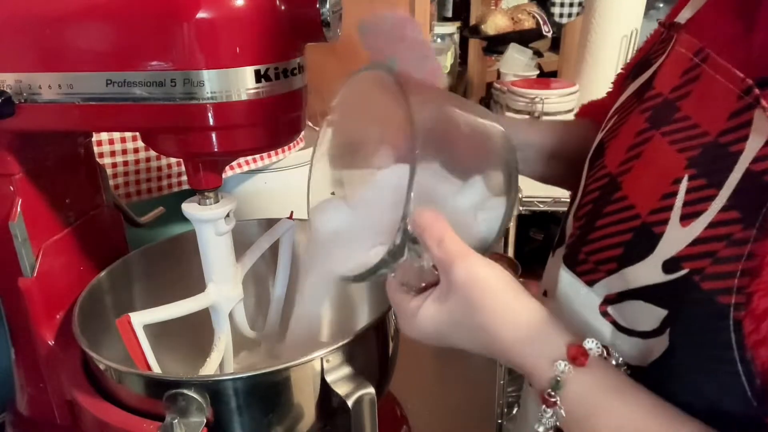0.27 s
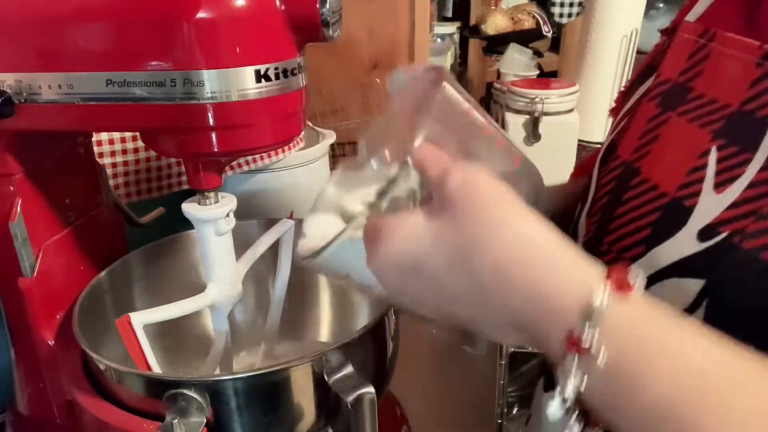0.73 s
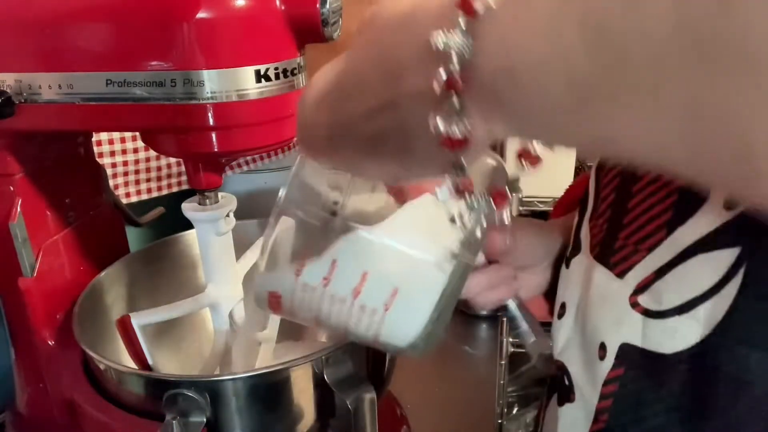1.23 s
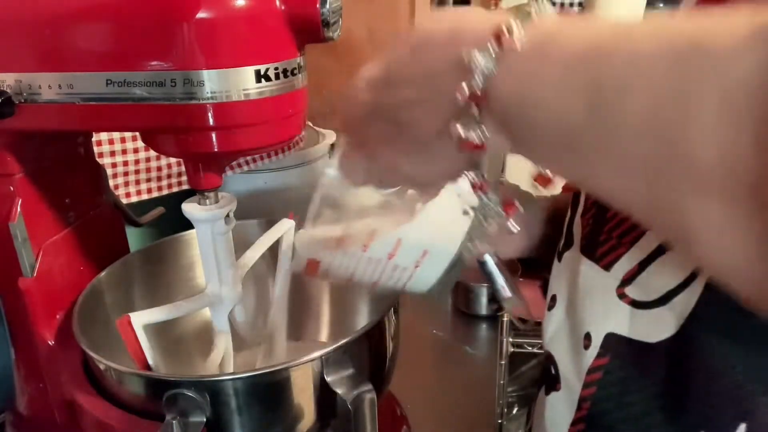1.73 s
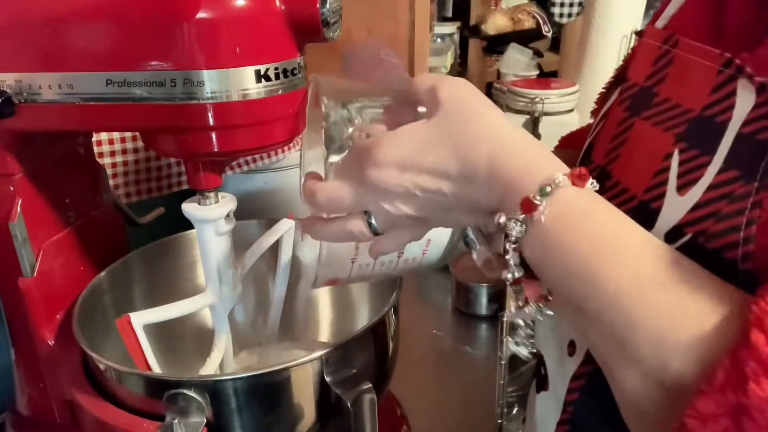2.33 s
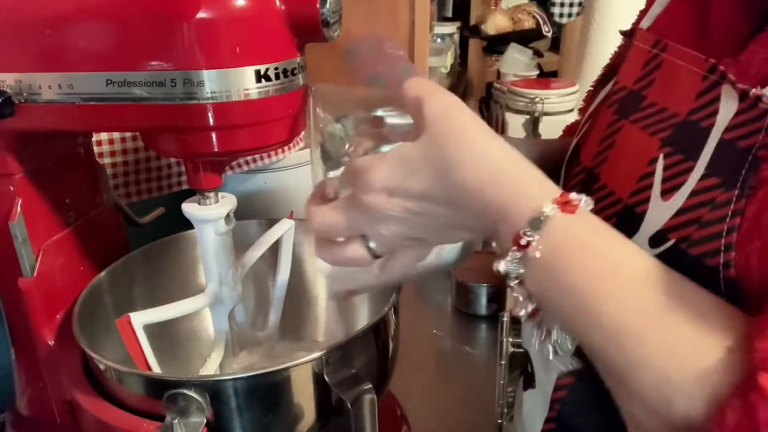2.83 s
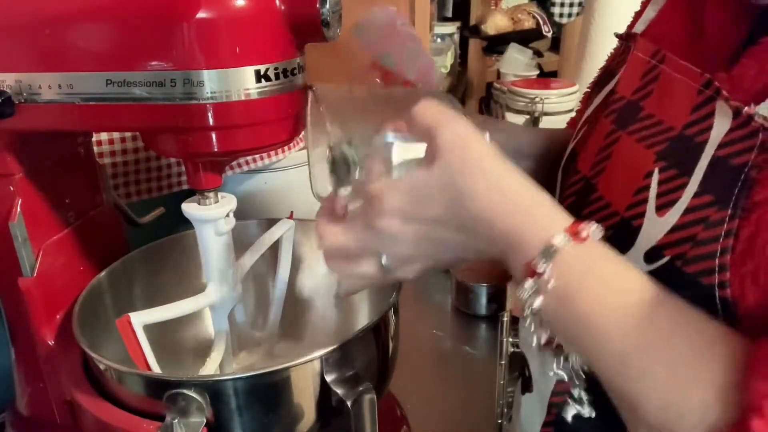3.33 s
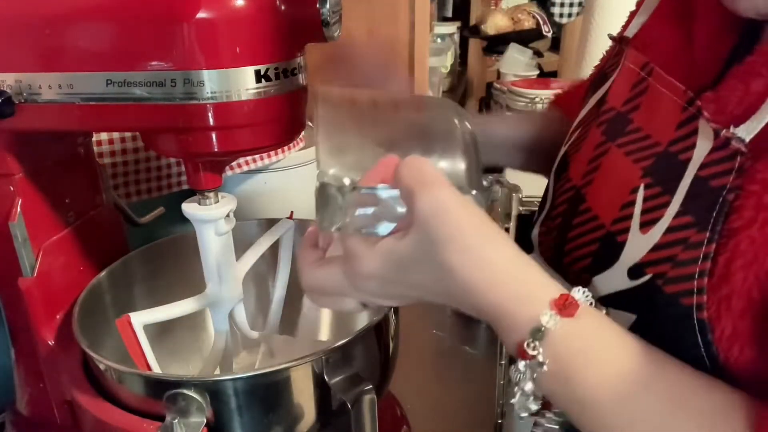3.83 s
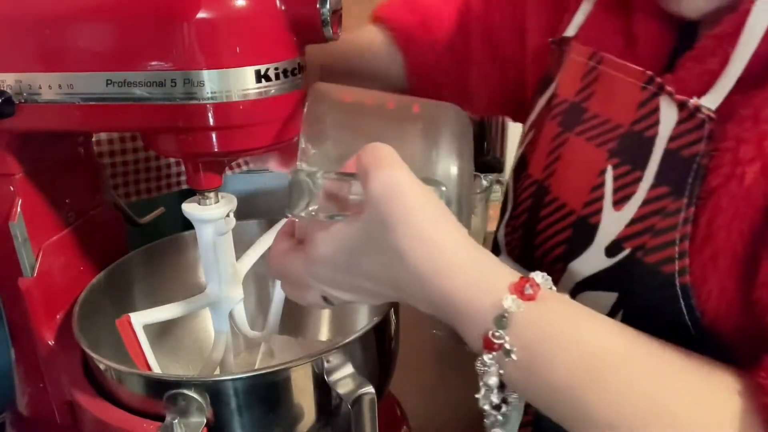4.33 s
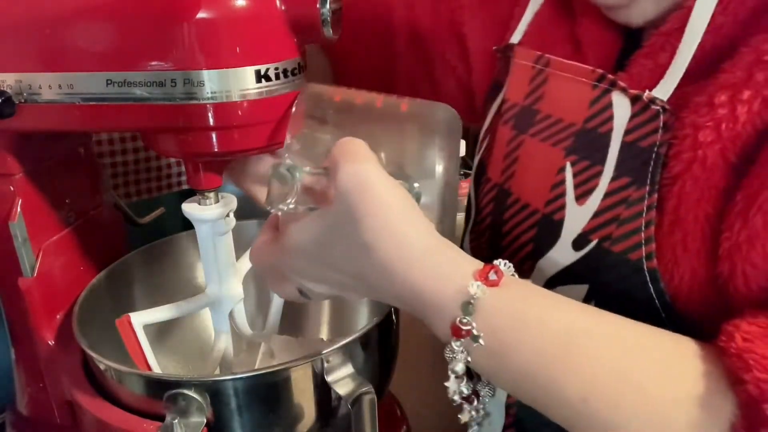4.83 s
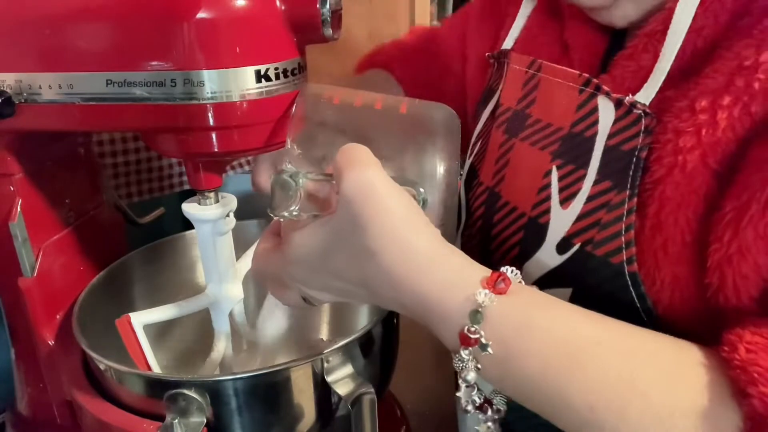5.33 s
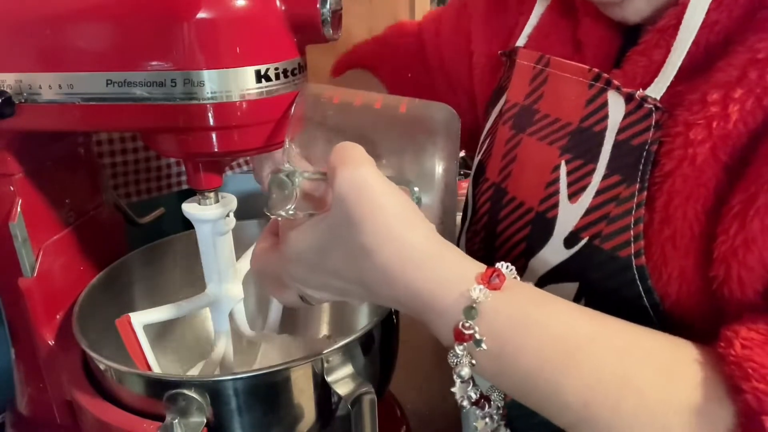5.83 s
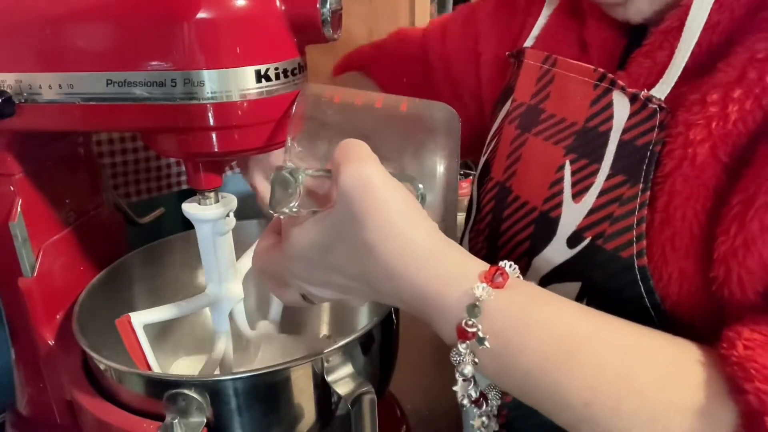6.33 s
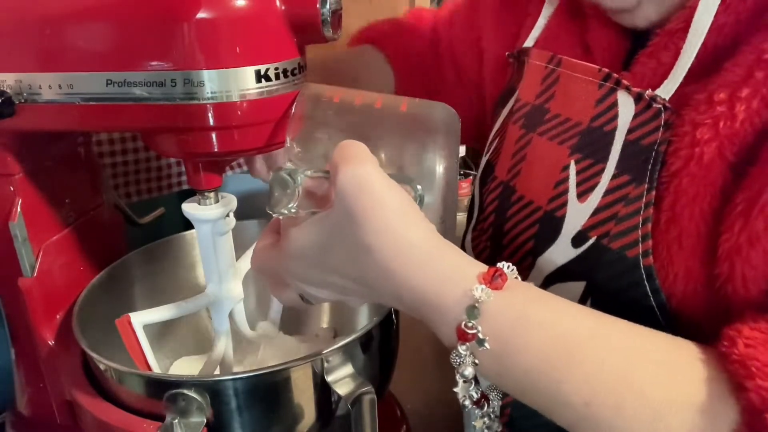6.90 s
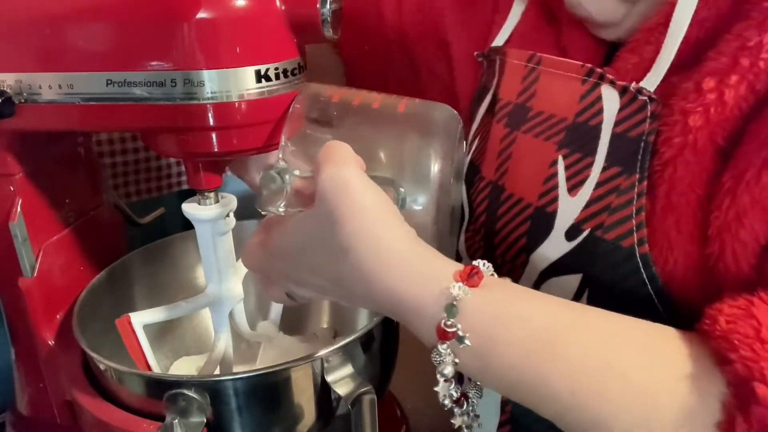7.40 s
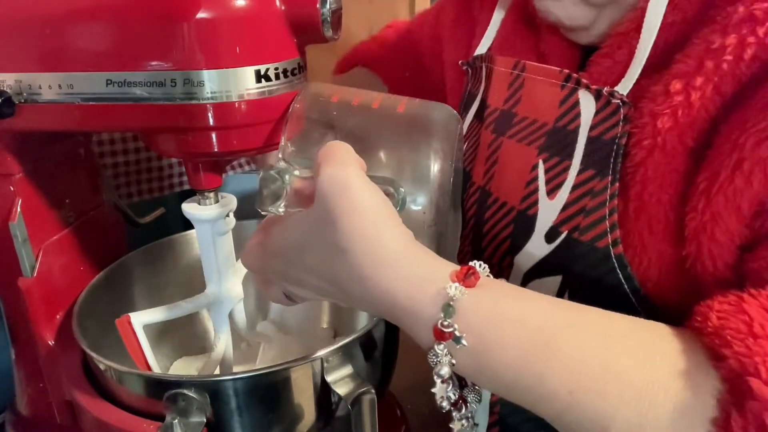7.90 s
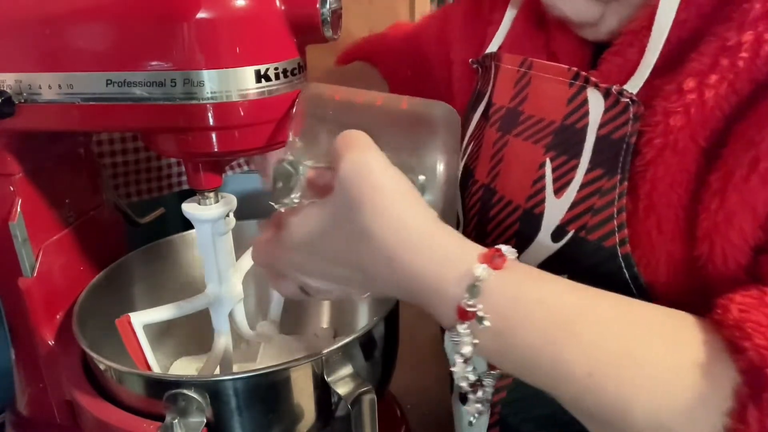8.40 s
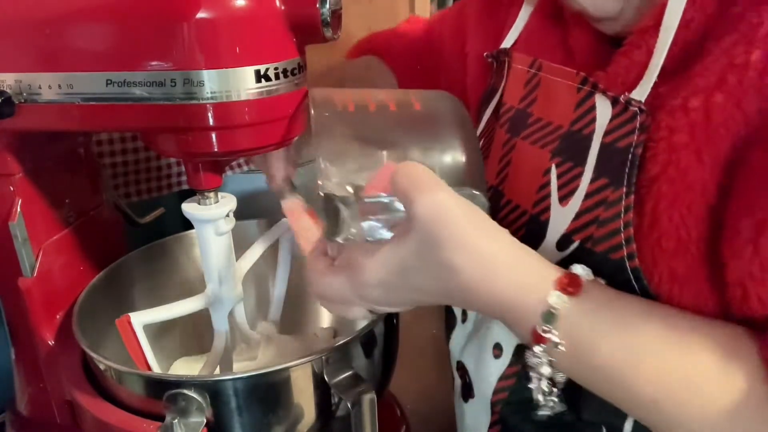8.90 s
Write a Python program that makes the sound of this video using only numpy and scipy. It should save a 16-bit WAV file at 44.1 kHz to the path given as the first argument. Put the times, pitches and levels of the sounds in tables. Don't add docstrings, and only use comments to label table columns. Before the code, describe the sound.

Close up in a small kitchen, a glass measuring cup scuffs a steel bowl, then sugar slides out with a soft hiss. Hard damped clunks burst around three seconds and again near five, followed by fingers sweeping grains from the bare glass in brighter rasps. Bead ticks scatter throughout, the stand thuds low, and a final cluster of knocks comes near nine seconds over a faint hum.

```python
import sys
import numpy as np
from scipy import signal
from scipy.fft import rfft, irfft, next_fast_len
from scipy.io import wavfile
from scipy.ndimage import uniform_filter1d, map_coordinates

SR = 44100
rng = np.random.default_rng(int(sys.argv[2]) if len(sys.argv) > 2 else 0)


def wrap_up_sound(samples):
    columns = np.atleast_2d(samples).T
    tamed = np.clip(columns, -1, 1)
    steps = np.round(tamed * 32767).astype(np.int16)
    wavfile.write(sys.argv[1], SR, steps)


def volts(x):
    e = np.asarray(x, float) / 20
    return 10 ** e


N = 403515


def rms_one(x):
    return x / np.sqrt(np.mean(x ** 2) + 1e-20)


def at_hz(points, hz):
    point_hz, point_db = np.transpose(points)
    return np.interp(np.log(hz), np.log(point_hz), point_db)


def passed(x, low_hz, high_hz):
    band = [low_hz, min(high_hz, .45 * SR)]
    return signal.sosfilt(signal.butter(2, band, "band", fs=SR, output="sos"), x)


def coloured(x, spectrum):
    hz = np.fft.rfftfreq(N, 1 / SR) + 1
    return rms_one(irfft(rfft(x) * volts(at_hz(spectrum, hz)), N))


def drift(rate):
    r = np.exp(-80 * np.pi * rate / SR)
    slow = signal.lfilter([1], [1, -2 * r, r * r], rng.standard_normal(N // 40 + 2002))[2000:]
    return np.interp(np.arange(N) / 40, np.arange(len(slow)), rms_one(slow))


def ring(clicks, hz, t60):
    r = volts(-60 / (t60 * SR))
    w = 2 * np.pi * hz / SR
    return signal.lfilter([0, np.sin(w)], [1, -2 * r * np.cos(w), r * r], clicks + 1e-18)


def grains(per_s, spread_db):
    sizes = volts(spread_db * np.minimum(rng.exponential(1, N), 5)) * rng.choice([-1, 1], N)
    return rms_one(sizes * (rng.random(N) < per_s / SR))


def strokes(rows, arch_db, rise_db, fall_db, rest_db):
    t = np.arange(0, N + 64, 64) / SR
    s, length, *levels = np.transpose(rows)[:, :, None]
    shape = -arch_db * (2 * np.clip((t - s) / length, 0, 1) - 1) ** 2
    shape = shape - rise_db * np.maximum(s - t, 0) - fall_db * np.maximum(t - s - length, 0)
    power = [np.sum(volts(2 * (db + shape)), axis=0) + volts(2 * rest_db) for db in levels]
    return [np.interp(np.arange(N) / SR, t, np.sqrt(p)) for p in power]


# (frequency [Hz], tipped [dB], held free [dB], pressed on the rim [dB])
SEAT = [(350, -12.5, -3, 10), (428, -2, -7., 0.5), (488, 1.5, -8.5, -2.5), (511.6, -9.5, 2.5, -8.5),
        (643, -1.5, 5.5, 3.5), (750, -1.5, -3, 0.), (789, -8.5, -6.5, 7.5), (885, 2, -7, 0.5),
        (962, -4, -2.5, -5.5), (1040, -2.5, 4., -1), (1190, 1.5, -0.5, 0.5), (1370, 0.5, -6.5, -4.5),
        (1484, -3, 7, -2.5), (1640, -8.5, 5, 3), (1827, 2.5, -3.5, -3), (2130, -3.5, 2.5, -1.),
        (2130, 10, -0.5, -4.5), (2464, 4.5, -7., 1), (2600, -2.5, 0.5, -1.5)]
RESEAT_S, SEATS = (2.6, 3.8, 8.4, 8.72), (1, 2, 3, 2, 3)


def seated_db(hz, s):
    levels = np.array([np.interp(hz, np.array(SEAT)[:, 0], column) for column in np.transpose(SEAT)])
    return levels[np.array(SEATS)[np.searchsorted(RESEAT_S, s)]]


# (frequency [Hz], level [dB], time to fall 60 dB [s])
BODY = [(334, -24.5, .08), (432, 2, 0.071), (477, 8.5, 0.03), (508.2, 6, 0.045), (641, -20, 0.13),
        (729, -6.5, 0.047), (777.3, -8.5, 0.049), (898.7, -4, 0.05), (958, 2.5, 0.023), (1053, 0, 0.036),
        (1164, -12, 0.069), (1385.5, -10, 0.065), (1475, -20.5, 0.054), (1557, -10, 0.022),
        (1830, 1, 0.013), (2106, 2, 0.022), (2110, -13.5, 0.025), (2440, -11, 0.032), (3620, -12, 0.098),
        (4010, -8, 0.038), (4775, -4, 0.13), (5020, -1.5, 0.076), (6235, 0.5, 0.075), (2870, -11, 0.13),
        (8600, -7, 0.011)]
GRAZE_DB, GRAZE_RISE_DB_PER_S = -28.5, 1700.5


def blows(table, contact_s, rattle_db, rattle_s):
    t, force = np.arange(5000) / SR, np.zeros((len(BODY), N + 5000))
    x = t / contact_s
    push = x * np.exp(-x)
    rattle = volts(rattle_db - 60 * t / rattle_s) * np.minimum(x, 1)
    graze = volts(GRAZE_DB - GRAZE_RISE_DB_PER_S * t[999::-1])
    hz, usual = np.array(BODY)[:, :1], np.sqrt(np.sum(push ** 2))
    zone = np.searchsorted([600, 1700, 2700], hz[:, 0])
    turn = np.exp(2j * np.pi * hz * t[:1000])
    noises = rng.standard_normal((len(table), len(BODY), 1000))
    for (s, db, low, mid, high), noise in zip(table, noises):
        drive = abs(np.sum(noise * push[:1000] * turn, axis=1))
        evened_push = push / np.maximum(drive, 0.68 * usual)[:, None]
        chatter = np.tile(noise, 5) * (evened_push + rattle / usual)
        zone_db = np.array([low, 0, mid, high])[zone]
        share = volts(db + zone_db + seated_db(hz[:, 0], s) + 2.0 * noise[:, 0])[:, None]
        start = round(s * SR) - 40
        force[:, start:start + len(t)] += share * chatter
        first = max(start - 1000, 0)
        force[:, first:first + 1000] += share * noise[::-1] * graze / usual
    return force[:, :N]


# (time [s], peak level [dB], low modes [dB], 2 kHz modes [dB], glass ring [dB])
KNOCKS = [(1.033, -15.5, -10, -9, -16), (1.039, -20, -8, -2.5, -14), (2.712, -25.5, -6.5, -9.5, -19),
          (2.733, -23.5, -8, -10.5, -19.5), (2.788, -25.5, -5, -20, -21), (2.807, -18.5, -8, -8.5, -22.5),
          (3.085, -13, -10.5, -0.5, -19.5), (3.159, -17, -9.5, -9, -24.5), (3.316, -10.5, -7.5, 2.5, -17),
          (3.449, -19, -1.5, 0, -22), (3.465, -7.5, -12.5, -4, -11.5), (3.573, -23.5, -8.5, -8, -20),
          (4.832, -12.5, -7, -5.5, -23), (4.866, -18, -10.5, -13, -27.5), (4.964, -15.5, -10, -20, -30.5),
          (4.987, -23.5, -5, -19.5, -33), (5.91, -26.5, -3, -27, -46.5), (7.398, -25, -3.5, -7.5, -30),
          (7.425, -28, -4, -11.5, -31), (8.531, -27.5, -15, -16, -27.5), (8.666, -28.5, -13, -18, -28),
          (8.687, -32.5, -16, -6.5, -27), (.037, -37, -6.5, -13, -20), (3.511, -28.5, -4, -7, -24),
          (8.733, -17, -3.5, -7, -20.5), (8.766, -15.5, -8, -6.5, -21.5), (8.785, -19, -16, -1.5, -36),
          (8.799, -20, -21, -8, -23), (3.006, -37, -2, -21.5, -29.5), (4.753, -33.5, -6, -15.5, -32),
          (5.003, -32, -6, -11, -28), (5.858, -57, 7, -20, -26.5), (5.927, -33.5, -10, -13, -36),
          (5.94, -43, 12, -20, -40), (6.105, -48.5, -9.5, -15, -29.5), (6.125, -42, -15, -24, -30),
          (8.488, -41.5, 1, -16, -22), (8.822, -29, -8, -18, -29), (8.967, -53, -8.5, -0.5, -3),
          (2.967, -45, -5, -30, -29.5), (5.521, -46, -13, -21, -25)]
# (time [s], peak level [dB], glass ring [dB])
SCUFFS = [(0.009, -22, -15), (0.045, -21, -14.5), (0.092, -17.5, -25), (0.114, -28.5, -26),
          (0.154, -25, -10), (0.177, -21, -18), (0.228, -23.5, -13), (0.24, -21, -22), (0.297, -26.5, -12),
          (.312, -27.5, -16), (0.387, -31, -0.5), (1.12, -27, -28), (1.453, -31, -10), (2.147, -27, -18),
          (2.359, -18.5, -13), (2.911, -30, -29), (3.016, -20.5, -26), (3.498, -15, -12),
          (3.674, -18.5, -15), (3.699, -22, -19.5), (4.718, -25.5, -29), (4.743, -31, -23),
          (5.742, -35, -26.5), (5.95, -27, -34.5), (7.445, -17, -26.5), (8.075, -38.5, -45.5),
          (8.484, -25, -19), (8.684, -22, -23), (8.839, -19.5, -40), (7.26, -29.5, -42.5),
          (9.035, -33.5, -10), (9.109, -34.5, -25), (2.72, -18, -15), (2.793, -21.5, -2), (3.325, -18, -23),
          (3.475, -11.5, -26), (8.672, -22, -11.5), (8.744, -12.5, -19), (8.775, -17, -1.5),
          (8.806, -18, -17), (8.86, -34, -38), (0.106, -24, -11.5), (.322, -22.5, -22), (.409, -24, -11),
          (0.127, -31, -42), (8.462, -36, -23), (2.335, -29.5, -15), (2.385, -31, -6), (2.564, -34, -25)]
WOBBLE_S, WOBBLE_PER_S = .0003, 7


def knocks():
    drags = [(s, db - 16.5, 0., -17., high) for s, db, high in SCUFFS]
    force = volts(-1.5) * blows(KNOCKS, contact_s=.0012, rattle_db=-30.0, rattle_s=0.22)
    force += blows(drags, contact_s=0.0062, rattle_db=-31.0, rattle_s=0.043)
    rings = []
    for f, (hz, db, t60) in zip(force, BODY):
        mode = ring(f, hz, min(t60, 250 / hz))
        rings.append(volts(db) * passed(mode, .5 * hz, 1.2 * hz))
    bent = np.arange(N) + WOBBLE_S * SR * drift(WOBBLE_PER_S)
    modes = map_coordinates(sum(rings[:14]), [bent], order=3) + sum(rings[14:])
    crack = passed(force[-1] + np.roll(force[-2], 200), 1700, 9500)
    return modes + volts(19.5) * passed(crack, 1600, 14000)


# (start [s], length [s], grind level [dB], glass song level [dB])
DRAGS = [(0, 0.15, -38.5, -51.5), (.24, 0.29, -45, -54.5), (.5, 0.31, -46, -45.5), (.63, 0.15, -56, -45.5),
         (1.02, 0.65, -58, -65), (1.29, 0.096, -47.5, -78), (1.45, 0.052, -34.5, -83),
         (1.54, 0.34, -42, -52.5), (1.9, 0.088, -51, -87), (2.0, 1, -55, -66.5), (2.37, 0.043, -38, -70.5),
         (2.47, 0.1, -51.5, -72), (2.7, 0.83, -53.5, -62.5), (3.35, 0.19, -42.5, -79),
         (3.6, 0.16, -41.5, -56.5), (3.89, 0.2, -48, -89), (4.15, 0.44, -64.5, -90),
         (4.7, 0.066, -46, -50.5), (4.78, 0.42, -65, -105.5), (5.0, 0.73, -61, -92),
         (5.93, 0.28, -49.5, -89), (6.05, 0.8, -64, -88.5), (7.38, 0.19, -57, -89), (8.05, 0.3, -74, -85.5),
         (8.45, 0.14, -34, -53), (8.55, 0.1, -40, -63.5), (8.68, 0.21, -39, -83),
         (8.945, 0.043, -34, -49.5), (9.02, 0.11, -67.5, -67)]
DRAG_ARCH_DB, DRAG_RISE_DB_PER_S, DRAG_FALL_DB_PER_S, DRAG_REST_DB = 8.5, 602.5, 397.5, -73.5
# (frequency [Hz], level [dB])
GRIND_TILT = [(300, -11.5), (520, -7), (750, -0.5), (1050, -5.5), (1600, -11), (2300, -15.5), (3000, -24.5)]
# (frequency [Hz], level [dB])
SINGING = [(4743, -8.5), (5010, -4), (6470, -6), (7500, -15.5), (2860, -13), (3580, -22)]
SKID_S, SKID_DB_PER_OCTAVE = (.43, 0.96), 7.5


def rubbing():
    grind, sing = strokes(DRAGS, DRAG_ARCH_DB, DRAG_RISE_DB_PER_S, DRAG_FALL_DB_PER_S, DRAG_REST_DB)
    t = np.arange(N) / SR
    skid = SKID_DB_PER_OCTAVE * (np.searchsorted(SKID_S, t) == 1)
    catches = grains(2700, 2.3) * grind * volts(2.3 * drift(21))
    low = np.zeros(N)
    for hz, db, t60 in BODY:
        if hz < 2700:
            reach = volts(seated_db(hz, t) + skid * np.log2(hz / 700))
            clicks = catches * reach * rng.choice([-1, 1], N)
            low += volts(db + at_hz(GRIND_TILT, hz)) * ring(clicks, hz, 1.37 * t60)
    patter = grains(6000, 2.5)
    song = sum(volts(db) * ring(np.roll(patter, 977 * k), hz, 0.068) for k, (hz, db) in enumerate(SINGING))
    sing = np.maximum(sing - volts(DRAG_REST_DB), 0)
    return volts(-29.0) * passed(low, 210, 2300) + volts(-6.0) * sing * rms_one(passed(song, 2200, 13000))


# (start [s], length [s], fine hiss level [dB], coarse rasp level [dB])
SLIDES = [(0, 0.24, -69, -95), (.33, 0.083, -71, -95), (.42, 0.44, -79, -69), (.6, 0.27, -68, -78),
          (.81, 0.28, -81, -75), (1.1, 0.31, -65, -65.5), (1.47, 0.4, -53, -57), (1.65, 0.41, -61.5, -69.5),
          (1.9, 0.39, -70, -102), (2.8, 0.4, -72, -67), (3.08, 0.62, -64.5, -59), (3.6, 0.42, -77.5, -91),
          (3.95, 0.38, -77, -70), (4.06, 0.046, -60.5, -79), (4.18, 0.051, -67, -82),
          (4.82, 0.45, -69, -66), (5.04, 0.5, -62.5, -63.5), (5.38, 0.26, -61, -65),
          (5.76, 0.46, -57, -58.5), (6.07, .13, -68, -64.5), (6.2, 0.086, -65.5, -71),
          (6.35, 0.29, -60, -59), (6.61, 0.16, -69.5, -70.5), (7.27, 0.069, -70.5, -72.5),
          (7.48, 0.36, -63, -65), (8.16, 0.28, -61, -61), (8.68, 0.24, -64, -59.5)]
SLIDE_ARCH_DB, SLIDE_RISE_DB_PER_S, SLIDE_FALL_DB_PER_S, SLIDE_REST_DB = 11.5, 390, 265, -85.5
# (frequency [Hz], level [dB per Hz])
HISS = [(3500, -44), (5000, -10.5), (7000, -4), (9400, -5), (11300, 3), (13200, -8), (15200, -10.5),
        (15700, -39)]
# (frequency [Hz], level [dB per Hz])
RASP = [(900, -31), (1300, -5.5), (1700, -4), (2300, -2), (3300, -1.5), (4300, -6), (5500, -15.5),
        (7000, -39.5)]
# (frequency [Hz], level [dB])
WHISTLES = [(2150, -2.5), (2600, -7), (3980, -3.5), (4950, -9), (6890, 1), (8050, -1.5), (8770, -4),
            (9390, 2), (9760, -10.5), (10400, 3), (12900, -5), (14100, -9)]
BARE_S, BARE_RING, COATED_RING = (4.97, 6.65), 1.1, 0.11
LOOSE_UNTIL_S, LOOSE_SHEEN_DB = 2.6, -15


def sugar():
    hiss, coarse = strokes(SLIDES, SLIDE_ARCH_DB, SLIDE_RISE_DB_PER_S, SLIDE_FALL_DB_PER_S, SLIDE_REST_DB)
    t = np.arange(N) / SR
    fall = grains(10000, 3.2) * volts(2.0 * drift(23))
    bare = np.where(np.searchsorted(BARE_S, t) == 1, BARE_RING, COATED_RING)
    lines = sum(volts(db + 3 * drift(16.0)) * ring(fall, hz, .07) for hz, db in WHISTLES)
    fine = coloured(fall, HISS) + bare * volts(-1.5) * rms_one(passed(lines, 6000, 15000))
    fine = fine + volts(LOOSE_SHEEN_DB) * (t < LOOSE_UNTIL_S) * passed(fine, 12000, 15200)
    rasp = coloured(np.roll(fall, 5000), RASP) * volts(2.5 * drift(12))
    rasp = rasp + bare * volts(-1) * rms_one(passed(lines, 1800, 5200))
    return volts(3.5) * hiss * fine + volts(-2.0) * coarse * rasp


# (start [s], length [s], level [dB])
TRICKLES = [
    (.8, .13, -64),
    (2.5, .22, -73.5),
    (2.86, .2, -69),
    (3.17, .13, -65.5),
    (3.36, .08, -65.5),
]
# (frequency [Hz], level [dB])
TRICKLE = [(2230, -4), (2720, 1), (4150, -8.5)]


def trickle():
    gain, = strokes(TRICKLES, 5., 300, 300, -110)
    patter = grains(6000, 2.5)
    lines = sum(volts(db) * ring(patter, hz, .03) for hz, db in TRICKLE)
    return gain * rms_one(passed(lines, 1800, 5000))


# (time [s], length [s], level [dB])
SPILLS = [
    (1.479, 0.063, -51.5),
    (4.058, 0.021, -71),
    (4.6, 0.04, -58.5),
    (5.451, 0.079, -47.5),
    (5.584, 0.0056, -56.5),
    (5.728, 0.032, -53.5),
    (6.068, 0.049, -47),
    (6.628, 0.033, -51),
]
# (frequency [Hz], level [dB per Hz])
SPILL = [(400, -3.5), (900, 5.5), (1500, -4.5), (3000, -8.5), (5000, -4), (8000, -6.5), (12000, -5.5),
         (16000, -15.5)]


def spills():
    t, gate = np.arange(N) / SR, np.zeros(N)
    for s, length, db in SPILLS:
        gate += volts(db - 570 * np.maximum(t - s - length, 0)) * (t > s)
    return gate * coloured(grains(4000, 3.8) * volts(3.7 * drift(46)), SPILL)


# (time [s], peak level [dB], pitch [Hz], snap level [dB])
TICKS = [(0.3603,-36.5,6760,-14),(.537,-49,10000,-6),(.79,-50,8000,-2),(1.144,-55,8900,0),(1.181,-49,8600,-7),(1.2,-51,8500,-3),(1.3332,-43.5,4350,6.5),
         (1.3843,-51,9370,-3),(1.417,-35,4200,-3),(1.4364,-47,8720,2),(1.4865,-44,8200,10),(1.5265,-36.5,10400,-6),(2.357,-53,4600,12),
         (2.9063,-52,6480,6),(2.9204,-53,8570,-6),(2.934,-46,9800,-8),(2.942,-41.5,6900,1),(3.051,-47,7500,-6),(3.135,-36.5,7060,-16),
         (3.416,-44,4730,11),(3.743,-56,7160,-8),(3.7703,-44,7300,-8),(3.7931,-49.5,7520,-9.5),(3.8749,-28,7090,-18),(4.0452,-55.5,7120,0),
         (4.065,-35,6620,-8.5),(4.0849,-36.5,6740,-14),(4.1774,-42.5,6680,-11),(4.2294,-59,8250,-5),(4.3923,-59,6800,-5.5),(4.5304,-51,7040,-7.5),
         (4.5444,-53,7230,-11),(4.5722,-45.5,7100,-12),(5.383,-36.5,5370,4.5),(5.452,-48,8910,-4),(5.5318,-35,7450,-4),(5.587,-33,7600,0),
         (5.7333,-43.5,4320,8),(5.893,-43,9460,-6),(6.0836,-41,8850,1),(6.339,-52.5,8080,-11),(6.3959,-40.5,6920,-3),(6.547,-42.5,4130,5),
         (6.609,-46,4930,-8),(6.6257,-39,5430,4),(6.6677,-48.5,4710,-7),(6.7103,-50.5,9400,-3),(6.8524,-37,7170,-8),(6.9112,-49,6940,-7.5),(7.1034,-42.5,7500,3)]


def ticks():
    t, out = np.arange(3000) / SR, np.zeros(N + 3000)
    for (s, db, hz, snap_db), noise in zip(TICKS, rng.standard_normal((len(TICKS), 3000))):
        snap = passed(noise * volts(snap_db - 60 * t / .007), 1.0 * hz, 16000)
        snap = passed(snap, 0.31 * hz, 14000)
        ping = 1.3 * passed(noise * volts(-60 * t / .03), .85 * hz, 1.2 * hz)
        sizzle = passed(noise[::-1] * volts(-60 * t / .15), .85 * hz, 1.5 * hz)
        sizzle = passed(sizzle, .85 * hz, 2 * hz)
        start = round(s * SR)
        out[start:start + len(t)] += volts(db) * (snap + ping + 0.17 * sizzle)
    return out[:N]


# (time [s], peak level [dB], pitch [Hz])
THUDS = [(0.4, -44.5, 132), (1.037, -33, 131), (2.103, -59, 89), (2.358, -35, 110), (2.737, -40, 148),
         (3.096, -35.5, 98.2), (3.319, -35.5, 114.7), (3.46, -30.5, 116.8), (4.223, -52, 79.8),
         (4.829, -36, 134), (4.964, -44, 123), (5.913, -42, 110), (6.228, -46.5, 90), (7.394, -44.5, 151),
         (8.091, -44, 97.2), (8.747, -34, 96), (9.078, -42, 88)]


def thuds():
    t, out, shake = np.arange(20000) / SR, np.zeros(N + 20000), np.zeros(N + 20000)
    x = t / 0.0042
    for s, db, hz in THUDS:
        here = slice(round(s * SR), round(s * SR) + len(t))
        out[here] += volts(db + 14.0) * x * x * np.exp(-1.5 * x) * np.sin(2 * np.pi * hz * t)
        shake[here] += volts(db - 7.0 - 60 * t / 0.61) * np.minimum(x / 2, 1)
    rumble = shake[:N] * rms_one(passed(rng.standard_normal(N), 52, 270))
    return passed(passed(out[:N], 34, 250), 36, 400) + rumble


def mottled(x, depth_db, treble_share):
    z = signal.stft(x, nperseg=768)[2]
    luck = uniform_filter1d(rng.standard_normal(z.shape[-2:]), size=12, axis=1)
    crowded = np.minimum(np.arange(len(luck))[:, None] / 24, 1)
    crowded[32:] = treble_share
    gain = volts(depth_db * crowded * luck / luck.std())
    return signal.istft(z * rms_one(gain), nperseg=768)[1][..., :N]


# (frequency [Hz], left leads [rad])
LEAD = [(30, 0), (500, 0), (900, .5), (1700, .3), (2300, -.6), (2750, -2.6), (3300, -1.6), (4100, -.8),
        (5200, -1.5), (5650, -2.6), (6150, -2.95), (6550, -2.0), (7580, -1.4), (8950, 0), (10335, 2.1),
        (10900, 3.0), (11900, 3.3), (12750, 5.2), (14800, 7), (16500, 8.5)]
# (frequency [Hz], left over right [dB])
TILT = [(60, 0.5), (130, 2), (300, -2.5), (1200, -4.5), (2600, -8), (4800, -2.5), (5600, -0.1), (9000, 0.5),
        (16000, -2)]


def ports(x, askew_rad=0):
    hz = np.fft.rfftfreq(N, 1 / SR) + 1
    lead = at_hz(LEAD, hz) + askew_rad * np.exp(-((hz - 6000) / 600) ** 2)
    half = volts(at_hz(TILT, hz) / 2) * np.exp(.5j * lead)
    return irfft(rfft(x) * np.array([half, 1 / half]), N)


KITCHEN_T60_S, WALL_CUT_HZ = 0.19, 1200


def kitchen(x):
    size = next_fast_len(N + SR)
    w = 2 * np.pi * np.fft.rfftfreq(size)
    dull = 1 / np.sqrt(1 + (w * SR / (2 * np.pi * WALL_CUT_HZ)) ** 2)
    heard = np.zeros((2, len(w)), complex)
    for k, lag in enumerate((rng.uniform(0.0064, 0.025, 16) * SR).astype(int)):
        loop = volts(-60 * lag / SR / KITCHEN_T60_S) * dull * np.exp(-1j * w * lag)
        heard[k % 2] += loop / (1 - loop) * (-1) ** (k // 2)
    return irfft(heard * rfft(x, size), size)[:, :N]


# (frequency [Hz], level [dB per Hz])
HUM = [(15, -34), (25, -19), (84, 7), (249, -1), (416, 3.5), (754, -10), (1230, -46.5), (3340, -34),
       (4870, -35.5), (5880, -24.5), (8830, -39), (10100, -28.5), (11000, -47.5), (14000, -37),
       (16000, -52.5)]
HUM_DB = -64.5


def hum():
    shared, left, right = (coloured(v, HUM) for v in rng.standard_normal((3, N)))
    motor = volts(-3.5) * rms_one(ring(rng.standard_normal(N), 191, 1.0))
    both = ports(shared + motor) + 1.5 * np.array([left, right])
    return volts(HUM_DB + 1.0 + 1.2 * drift(1.1)) * both


ASKEW_RAD, ASKEW_SHARE, ASKEW_PER_S = 1, 0.57, 1.4


def scene():
    rough = rubbing() + sugar() + trickle() + spills()
    near = knocks() + mottled(rough, depth_db=5.5, treble_share=.7) + ticks() + thuds()
    off_sweep = np.searchsorted(BARE_S, np.arange(N) / SR) != 1
    askew = np.clip(ASKEW_SHARE + 0.41 * drift(ASKEW_PER_S), 0, 1) * off_sweep
    heard = ports(near * (1 - askew)) + ports(near * askew, askew_rad=ASKEW_RAD)
    echo = volts(-11.0) * passed(kitchen(near), 390, 13000)
    return heard + echo + mottled(hum(), depth_db=6.5, treble_share=0.71)


def roll_off(x):
    return signal.sosfilt(signal.butter(12, 16450, fs=SR, output="sos"), x)


def record(dry):
    top = .93
    rounded = np.sign(dry) * top / 2 * (1 + np.tanh(2 * abs(dry) / top - 1))
    x = np.where(abs(dry) < top / 2, dry, rounded)
    x = signal.sosfilt(signal.cheby2(10, 40, 16450, fs=SR, output="sos"), x)
    return roll_off(x)


dry = scene()
out = record(dry)
wrap_up_sound(out)
```